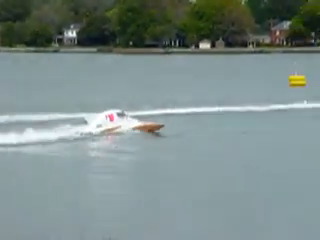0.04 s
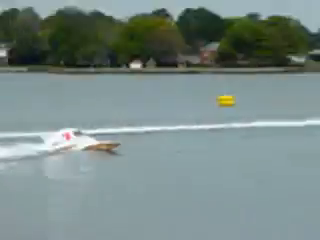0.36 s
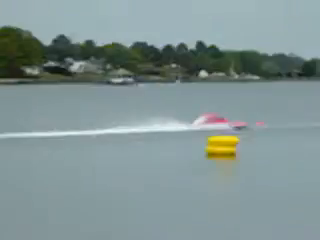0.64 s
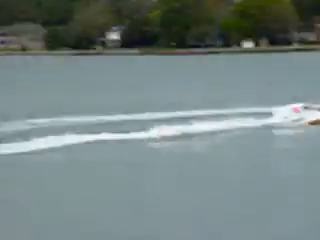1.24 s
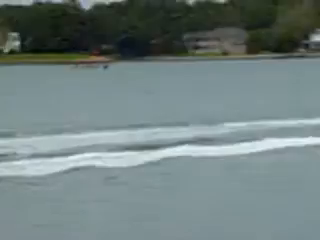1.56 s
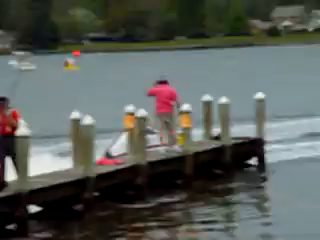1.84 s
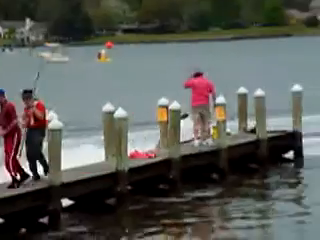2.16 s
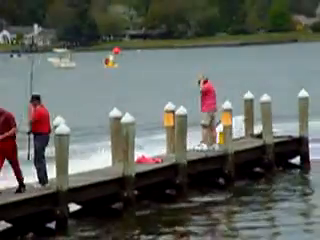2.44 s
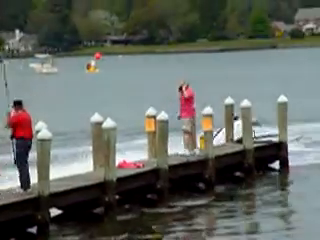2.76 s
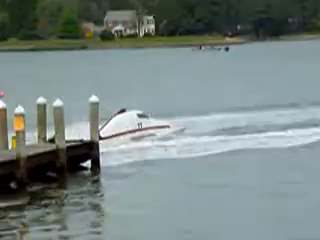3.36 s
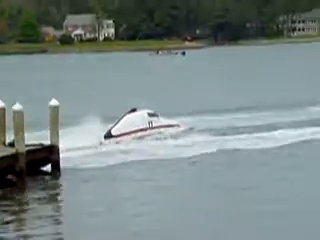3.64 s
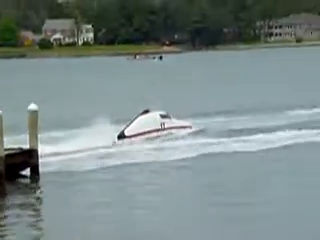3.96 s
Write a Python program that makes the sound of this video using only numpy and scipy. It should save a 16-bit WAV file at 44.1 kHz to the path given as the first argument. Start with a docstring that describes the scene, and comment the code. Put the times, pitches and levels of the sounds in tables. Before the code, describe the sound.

Three racing boats whine and rasp over open water, one steady, one accelerating, one passing loudly before its pitch sinks. Spray hisses in swells over a low roar, slightly overloading a microphone on the riverbank.

```python
"""Three racing boats circle on a river, heard from the bank. From the start one holds a high, steady note.
In the first second and a half another opens its throttle and climbs in pitch. The third passes, loudest
just after two seconds, then falls in pitch and fades. Throughout, the exhausts rasp in time with the
firing, spray hisses in swells, and the narrow-band microphone overloads on the peaks."""
import sys
import numpy as np
from scipy.fft import rfft, irfft, next_fast_len
from scipy.io import wavfile
from scipy.ndimage import map_coordinates

SR = 44100
rng = np.random.default_rng(int(sys.argv[2]) if len(sys.argv) > 2 else 0)


def generate_wav(signal):
    """Clip the signal to [-1, 1] and save it as 16-bit WAV at the path in sys.argv[1]."""
    frames = np.transpose(np.atleast_2d(signal))
    scaled = np.clip(frames, -1, 1) * 32767
    pcm = np.round(scaled).astype(np.int16)
    wavfile.write(sys.argv[1], SR, pcm)


N = 176400
BAND_HZ, TOP_HZ = 4630, 15800  # upper limits of the microphone's band and of the whole sound
# Midrange spectrum of the exhaust gas. Each row: frequency in Hz, relative level in dB.
EXHAUST_MIDRANGE = [(500, -17), (800, -4), (980, -4.5), (1180, -0.5), (1420, -4.5), (1680, -0.5),
                    (1900, -8), (2300, -34.5)]


def amp(db):
    """Amplitude grows tenfold for every 20 dB."""
    return 10 ** (np.asarray(db) / 20)


def unit(x):
    """Normalisation to an rms of 1."""
    return x / np.sqrt(np.mean(x ** 2) + 1e-20)


def curves(rows):
    """Linear interpolation in time: one value per sample for each column after the first."""
    times, *columns = np.transpose(rows)
    return [np.interp(np.arange(N) / SR, times, column) for column in columns]


def wobble(rate):
    """Smooth random fluctuation: a spline through rate knots a second."""
    return map_coordinates(rng.standard_normal(2048), [np.arange(N) * rate / SR], mode="mirror")


def filtered(x, response):
    """Linear filtering: the spectrum of x is multiplied by a frequency response."""
    size = next_fast_len(N + SR // 4)
    return irfft(rfft(x, size) * response(np.fft.rfftfreq(size, 1 / SR)), size)[:N]


def coloured(x, spectrum):
    """Spectral shaping by (Hz, dB) points on a logarithmic frequency axis, at an rms of 1."""
    freqs, db = np.transpose(spectrum)
    return unit(filtered(x, lambda hz: amp(np.interp(np.log(hz + 1), np.log(freqs), db))))


def noise(spectrum, gate=1):
    """Source and filter: white noise is modulated by the gate, then coloured."""
    return coloured(gate * rng.standard_normal(N), spectrum)


def diffuse_roar():
    """Low random noise has a continuous spectrum, heard as a roar without pitch."""
    # Each row: frequency in Hz, relative level in dB.
    spectrum = [(20, -18.5), (60, -20.5), (105, -8), (150, -3.5), (220, -0.5), (300, -2.5), (450, 0.5),
                (650, -2.5), (800, -3.5), (1600, -40.5)]
    # Each row: time in seconds, mean level in dB.
    levels = [(0, -25.5), (.9, -25.5), (1.6, -28.5), (2.7, -27.5), (3.3, -22), (4, -24)]
    return amp(curves(levels)[0] + 0.7 * wobble(8)) * noise(spectrum)


def spray(gate):
    """Band-pass noise swells under Gaussian envelopes, chopped as the propellers throw water."""
    # Each row: peak time and half length in seconds, centre and half width in Hz, peak level in dB.
    swells = [(.76, .22, 2280, 340, -21), (1.07, .09, 3680, 250, -27.5), (1.68, .11, 2150, 320, -22.5),
              (1.8, .09, 3400, 460, -22.5), (2.42, .15, 3000, 350, -30), (3.51, .045, 2220, 240, -17.5),
              (3.75, .09, 2570, 320, -20.3), (3.93, .13, 2420, 280, -20)]
    t, out = np.arange(N) / SR, np.zeros(N)
    for peak_s, half_length, centre, half_width, db in swells:
        chopped = gate * rng.standard_normal(N)
        hiss = unit(filtered(chopped, lambda hz: 1 / (1 + ((hz - centre) / half_width) ** 2)))
        out += amp(db) * np.exp(-((t - peak_s) / half_length) ** 2) * hiss
    return out


def puffs(cycles, count, decay, scatter_db=2.2):
    """Exponential decay: count uneven gas puffs a cycle, with decay a fraction of their period."""
    elapsed = count * cycles
    size = amp(scatter_db * rng.standard_normal(4096))[elapsed.astype(int)]
    return unit(size * np.exp(-(elapsed % 1) / decay))


def exhaust_rasp(gate):
    """Amplitude modulation: the puffs chop three bands of gas noise, the treble most deeply."""
    # Each row: time in seconds, then relative levels in dB of the middle, upper and treble bands.
    levels = [(0, -16, -22, -36.5), (.38, -18, -22.5, -37), (.8, -17.5, -23.5, -31), (1.1, -20.5, -24, -32),
              (1.35, -25, -25, -28), (1.62, -20, -24, -26.5), (1.8, -23.5, -20, -30),
              (2.1, -20, -23.5, -27), (2.36, -22.5, -22.5, -30), (2.75, -20, -23.5, -29),
              (3.15, -21, -24, -32.5), (4, -25, -28.5, -32.5)]
    # Spectra of the two higher bands. Each row: frequency in Hz, relative level in dB.
    upper_band = [(1500, -33.5), (1950, -5.5), (2150, -4.5), (2500, -3.5), (2950, -8.5), (3500, -26)]
    treble_band = [(2400, -26), (3000, 4), (3600, 1.5), (4300, 1), (4700, -11)]
    middle_db, upper_db, treble_db = curves(levels)
    middle = amp(middle_db - 3.0 + 0.36 * wobble(15)) * noise(EXHAUST_MIDRANGE, gate + 4.6)
    upper = amp(upper_db - 2.0 + 0.45 * wobble(14)) * noise(upper_band, gate + 2.1)
    treble = amp(treble_db + 2.13 + 1.6 * wobble(24.91)) * noise(treble_band, gate + 0.16)
    return middle + upper + treble


def pressure_spikes(cycles, count, jitter_s=.00005, scatter_db=2.2):
    """A quasi-periodic impulse train: count spikes a cycle, slightly uneven in time and size."""
    at = np.flatnonzero(np.diff(np.floor(count * cycles)))
    late, size = rng.standard_normal((2048, 2))[:len(at)].T
    at = np.clip(np.round(at + jitter_s * SR * late), 0, N - 1).astype(int)
    return np.bincount(at, amp(scatter_db * size), N)


def exhaust_cracks(steady, chasing):
    """Impulse excitation: filtered pressure spikes give two of the exhausts a sharp bark."""
    # Each row: time in seconds, level of the steady boat in dB, level of the chasing boat in dB.
    levels = [(0, -34, -41), (.8, -32, -39.5), (1.3, -32.5, -22.5), (1.65, -26, -23), (2.4, -31, -30),
              (3.2, -38, -36), (3.6, -36.5, -21), (4, -39, -28.5)]
    # Spectrum of the chasing boat's cracks. Each row: frequency in Hz, relative level in dB.
    spectrum = [(400, -22.5), (800, -11), (1600, -0.5), (2600, -1.5), (4600, -9.5)]
    steady_db, chasing_db = curves(levels)
    return (amp(steady_db) * coloured(pressure_spikes(steady, count=1), EXHAUST_MIDRANGE)
            + amp(chasing_db) * coloured(pressure_spikes(chasing, count=4), spectrum))


def engine_cycles(firing_hz, firings_per_cycle, speed_wander=.0015):
    """Phase is the integral of frequency: the firing rate accumulates into engine cycles."""
    hz, = curves(firing_hz)
    return np.cumsum(hz * (1 + speed_wander * wobble(20))) / SR / firings_per_cycle + rng.random()


def exhaust_note(cycles, orders, gains, turn_s, turn_length_s=.98, flutter_db=2.1, wander_rad=.15):
    """Directivity: the harmonics shift in balance as the boat turns, and each flutters over the water."""
    turned = .5 + .5 * np.tanh((np.arange(N) / SR - turn_s) / turn_length_s)
    out = np.zeros(N)
    for order, before, after in orders:
        phase = 2 * np.pi * (round(order) * cycles + rng.random()) + wander_rad * wobble(10)
        db = before + (after - before) * turned + flutter_db * wobble(10)
        out += amp(db) * np.sin(phase)
    return np.sqrt(2) * amp(curves(gains)[0]) * out


def engine_notes(steady, passing, chasing):
    """Periodic firing gives each boat a harmonic series built on its engine cycle."""
    # Partials. Each row: multiple of the cycle rate, relative levels in dB before and after the turn.
    steady_orders = [(2, -23, -29), (3, -23.5, -22.5), (4, -40.5, -28), (5, -28, -33), (7, -29.5, -36),
                     (9, -34.5, -42.5), (13, -32, -39.5), (16, -44, -38.5)]
    passing_orders = [(2, -54, -46.5), (4, -27, -31.5), (7, -26.5, -30.5), (8, -21, -18), (9, -29, -36),
                      (11, -25, -34.5), (12, -24.5, -25), (13, -28.5, -32), (15, -33.5, -30.5),
                      (16, -35.5, -36), (17, -33, -35.5)]
    chasing_orders = [(4, -28.5, -26), (6, -26.5, -37), (7, -33.5, -33), (8, -23.5, -19.5), (11, -38, -27),
                      (12, -33, -24.5), (13, -27.5, -46), (15, -35, -25), (16, -25, -34)]
    # Rise and fall of each note. Each row: time in seconds, gain in dB.
    steady_gains = [(0, -.5), (1, .5), (1.7, -4.5), (2.4, -1), (3.4, 0), (4, .7)]
    passing_gains = [(0, 0), (.8, .5), (1.4, -.5), (1.65, -6.5), (2.08, -2.5), (2.25, 4), (2.85, 2),
                     (3.3, -3.8), (4, -11)]
    chasing_gains = [(0, -10), (.5, -5), (1.1, 0), (1.35, -6), (1.6, 0), (2.0, -1), (2.2, -12), (2.75, -11),
                     (3.1, -.5), (3.6, -3.2), (4, -1.2)]
    return (exhaust_note(steady, steady_orders, steady_gains, turn_s=1)
            + exhaust_note(passing, passing_orders, passing_gains, turn_s=1.46)
            + exhaust_note(chasing, chasing_orders, chasing_gains, turn_s=1.41))


def scene():
    """Superposition: the engines' notes, cracks and rasp add to the spray and the roar."""
    # Engine speeds. Each row: time in seconds, firing rate in Hz.
    steady_hz = [(0.0, 384.4), (0.12, 388.4), (1.15, 390.5), (1.35, 385.2), (2.0, 390.4), (2.65, 393.9),
                 (2.9, 391.3), (3.2, 397.1), (4.0, 405.5)]
    passing_hz = [(0.0, 351.1), (0.5, 350), (0.8, 355.7), (1.2, 353.1), (1.38, 335.8), (1.7, 336.7),
                  (2.05, 345.9), (2.45, 344.8), (2.75, 347), (2.98, 337.6), (3.25, 310.7), (3.55, 298.6),
                  (3.78, 281.9), (4.0, 275.3)]
    chasing_hz = [(0.0, 250), (0.5, 258.3), (0.9, 292.2), (1.22, 293.9), (1.38, 333.4), (1.55, 354),
                  (1.85, 347.9), (2.45, 346.7), (2.85, 347.9), (3.14, 354), (3.3, 344.5), (3.56, 333.5),
                  (3.8, 337.8), (4.0, 336.8)]
    steady = engine_cycles(steady_hz, firings_per_cycle=3)
    passing = engine_cycles(passing_hz, firings_per_cycle=8)
    chasing = engine_cycles(chasing_hz, firings_per_cycle=8)
    engines = engine_notes(steady, passing, chasing) + exhaust_cracks(steady, chasing)
    chasing_puffs = puffs(chasing, count=4, decay=0.13)
    steady_puffs = 1.4 * puffs(steady, count=1, decay=0.46)
    passing_puffs = 0.85 * puffs(passing, count=4, decay=0.29)
    gate = unit(np.sqrt(steady_puffs ** 2 + passing_puffs ** 2 + chasing_puffs ** 2))  # powers add
    return (engines + exhaust_rasp(gate) + spray(chasing_puffs + 0.37) + diffuse_roar())[None]


def treble_clicks(spikes, corner_hz):
    """Band-limited impulses: clicks above the engines' band, dulled beyond a corner frequency."""
    def response(hz):
        return (hz > BAND_HZ) * (hz < TOP_HZ) / (1 + (hz / corner_hz) ** 3)
    return filtered(spikes, response) / response(np.fft.rfftfreq(N, 1 / SR)).mean()  # peaks keep height


def overload_ticks(crackle_db=-40.5, scatter_db=3, spread_s=.08):
    """Overload transients: ticks at set times, each amid a random cluster of fainter, brighter crackle."""
    # Each row: time in seconds, relative peak level in dB.
    ticks = [(0.2208, -28.5), (0.5348, -27.5), (0.5806, -36.5), (0.6547, -34), (0.7422, -35.5),
             (0.8061, -34.5), (0.8681, -33.5), (0.9585, -31.5), (1.1005, -28.5), (1.4236, -29.5),
             (1.5713, -25), (1.6404, -29.5), (1.6671, -27), (1.947, -36.5), (2.0208, -32), (2.135, -36.5),
             (2.174, -30.5), (2.7332, -32.5), (3.083, -32), (3.4775, -31.5), (3.6102, -29.5), (3.687, -30),
             (3.698, -27.5), (3.717, -29.5), (3.742, -32), (3.7764, -27.5), (3.9844, -35.5)]
    times, db = np.transpose(ticks)
    loud = np.bincount((times * SR).astype(int), amp(db + 3.5), N)
    centres = np.tile(times, 4)
    late, size = rng.standard_normal((len(centres), 2)).T
    at = ((centres + spread_s * late) * SR).astype(int) % N
    faint = np.bincount(at, amp(crackle_db + scatter_db * size), N)
    return treble_clicks(loud, corner_hz=7600) + treble_clicks(faint, corner_hz=12800)


def record(dry, asymmetry=.12, ceiling=.79, hiss_db=-84):
    """Nonlinear distortion: the narrow-band microphone saturates unevenly; ticks and hiss are added."""
    x = dry[0] + asymmetry * filtered(dry[0] ** 2, lambda hz: hz / (hz + 300))
    x = x / (1 + np.abs(x / ceiling) ** 6) ** (1 / 6)  # soft clipping
    x = filtered(x, lambda hz: np.clip((BAND_HZ + 60 - hz) / 160, 0, 1) ** 2)
    x = x + overload_ticks() + amp(hiss_db) * rng.standard_normal(N)
    return filtered(x, lambda hz: hz < TOP_HZ)[None]


dry = scene()
out = record(dry)
generate_wav(out)
```